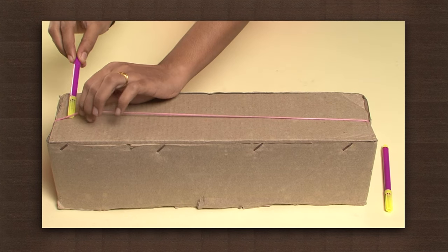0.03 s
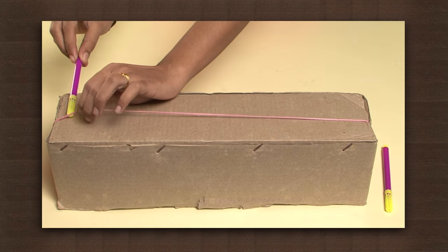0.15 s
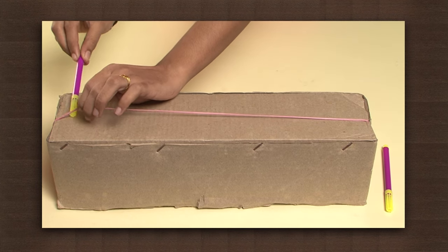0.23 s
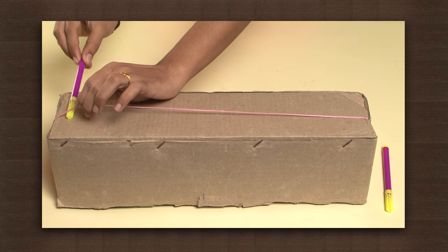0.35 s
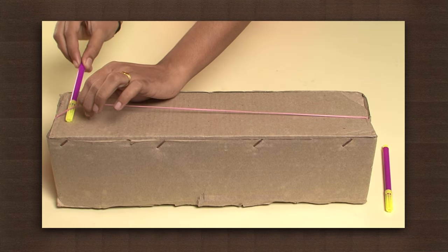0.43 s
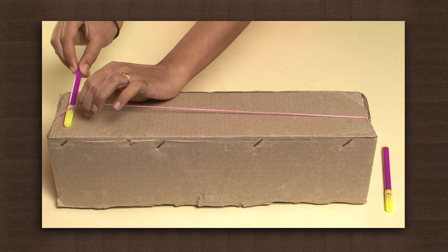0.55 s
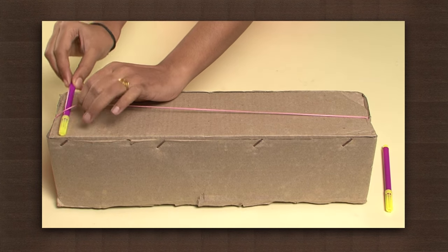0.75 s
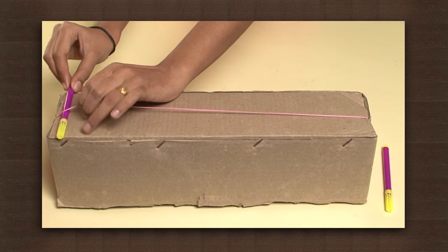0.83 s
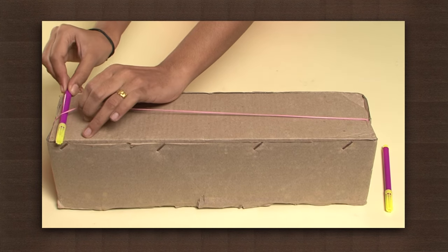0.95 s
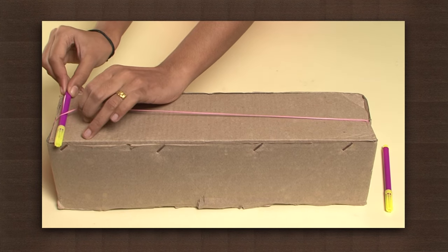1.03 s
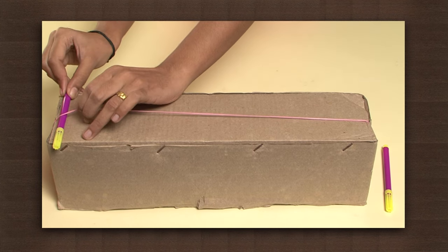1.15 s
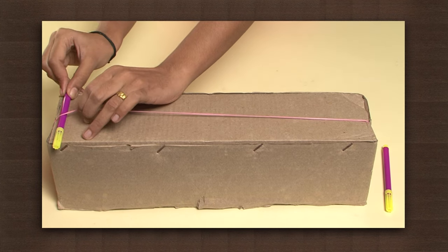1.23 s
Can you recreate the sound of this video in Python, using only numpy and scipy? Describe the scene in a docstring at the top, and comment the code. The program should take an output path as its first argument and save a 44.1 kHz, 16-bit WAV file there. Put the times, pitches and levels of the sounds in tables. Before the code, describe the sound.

One dull knock of a rubber band on cardboard, a brief twang, then soft scraping.

```python
"""A dull knock with two quick rebounds and a short low twang, amid soft rubbing in a quiet, humming room.
A rubber band stretched along a cardboard box slips off a plastic stick and slaps the lid: the stick
clicks, the box rings and the band swings, sinking in pitch. Then the stick scrapes and slides under the
band while fingers brush and tap the cardboard. Everything sits close and a little to the left."""
import sys
import numpy as np
from scipy import signal
from scipy.fft import rfft, irfft
from scipy.io import wavfile
from scipy.ndimage import uniform_filter1d

SR = 44100
rng = np.random.default_rng(int(sys.argv[2]) if len(sys.argv) > 2 else 0)


def transcribe(signal):
    """Save signal, clipped to [-1, 1], as a 16-bit WAV file at the path in sys.argv[1]."""
    frames = np.atleast_2d(signal).T
    limited = np.clip(frames, -1, 1)
    pcm = np.round(limited * 32767).astype(np.int16)
    wavfile.write(sys.argv[1], SR, pcm)


N = 57330

# Room tone. Each row: frequency in Hz, relative level in dB.
ROOM_TONE_EQ = [(20, -16), (55, 4.5), (80, 0), (140, 2.5), (220, -1), (300, -4), (400, -11.5), (530, -15),
                (950, -17), (1300, -24.5), (3500, -29.5), (7000, -32.5), (12500, -33), (14200, -39),
                (15000, -58)]
# The hum. Each entry: level of one harmonic in dB, lowest first.
HUM_HARMONICS = [-55.5, -61, -67]

# Fader moves for the four friction layers. Each row: time in seconds, level in dB.
RUB_FADER = [(0, -59.5), (.03, -52), (.11, -71.5), (.31, -58), (.4, -55.5), (.6, -59.5), (.75, -66),
             (.815, -50.5), (.9, -58.5), (1.0, -70), (1.11, -59), (1.18, -70), (1.3, -94)]  # fingers rub the lid
BRUSH_FADER = [(0, -69.5), (.16, -78), (.31, -72), (.35, -61.5), (.43, -60.5), (.62, -63), (.7, -55),
               (.75, -57.5), (.81, -51.5), (.89, -57), (.95, -62.5), (1.02, -65.5), (1.11, -57.5),
               (1.145, -62), (1.18, -75.5), (1.3, -76.5)]  # skin and plastic brush the cardboard
SCRAPE_FADER = [(.30, -74), (.325, -55.5), (.345, -46.5), (.375, -70), (.44, -70)]  # the stick catches with a dry scrape
SLIDE_FADER = [(.33, -74), (.38, -53), (.415, -51), (.53, -54.5), (.61, -58), (.67, -58.5), (.76, -68)]  # then slides along under the band
# Tone of the same four layers. Each row: frequency in Hz, relative level in dB.
RUB_EQ = [(200, -14), (330, -3), (410, -6), (520, 7.5), (640, -2), (850, -9.5), (1270, -14.5), (1520, -13),
          (1900, -22.5), (3200, -25.5), (8000, -46)]
BRUSH_EQ = [(800, -5), (2500, -2.5), (5000, -6), (7800, -6), (9500, 1), (11000, 4), (13000, 3), (14200, -7),
            (15000, -56)]
SCRAPE_EQ = [(400, -7.5), (800, -6.5), (1100, 1), (1500, -14.5), (2200, -9.5), (2700, -20), (8000, -31.5)]
SLIDE_EQ = [(380, -16), (490, 9.5), (580, -6), (720, 3), (1020, -1.5), (1270, -14), (1430, 0.5), (1600, -1),
            (1800, -14), (2300, -19.5), (3200, -30), (8000, -26)]

# Handling ticks. Each row: start in seconds, level in dB before the shared trim.
HANDLING_TICKS = [(0.0767, -50), (0.291, -46.5), (0.967, -44.5), (1.2202, -49.5)]
# Bright crackle of ticks and hits. Each row: frequency in Hz, relative level in dB.
CRACKLE_EQ = [(1500, -23), (3500, -5.5), (6500, -10), (9000, -7), (10500, -2), (12500, -4.5), (14200, -8),
              (15000, -33)]

# Hits on the box. Each row: start in seconds, thud gain in dB, click gain in dB, thud cutoff in Hz.
BAND_SLAPS = [(.2171, 1, 2, 1204), (0.2253, -9, -4, 1620), (0.2302, -18, -15, 1710)]  # the band lands and rebounds twice
LIGHT_TAPS = [(0.6475, -25, -16, 417), (0.6511, -16.5, -45, 224), (.6935, -30.5, -18, 606)]  # stick and fingers
# Resonances of box and stick. Each row: frequency in Hz, level in dB, time to fall 60 dB in seconds.
BOX_MODES = [(246, -24, 0.025), (342, -20.5, 0.038), (424, -11.5, 0.023), (489, -16, 0.043),
             (633.5, -21.5, 0.042), (747, -27.5, 0.063), (942, -18.5, 0.027), (1117, -29, 0.052),
             (1312, -22, 0.018), (1480, -27, 0.034), (1740, -31, 0.031), (1930, -34, 0.034),
             (2904, -24, 0.023)]
STICK_MODES = [(3850, -45.5, 0.013), (5030, -33.5, 0.0038), (7780, -43, 0.015), (10530, -19.5, 0.0033),
               (10760, -39, 0.0021), (13300, -40, .004), (14100, -30, 0.0053)]
# The room's short tail after a hit. Each row: frequency in Hz, relative level in dB.
ROOM_TAIL_EQ = [(100, -2), (170, 12), (300, 5.5), (500, 9.5), (680, -7), (950, -4), (1400, -15),
                (2200, -12), (4000, -30), (15000, -39)]
# The band's harmonics, lowest first. Each row: level in dB, time to fall 60 dB in seconds.
BAND_HARMONICS = [(-18.5, 0.14), (-33, 0.066), (-40, 0.063), (-34.5, 0.1)]


def undb(db):
    """Decibels to gain."""
    return 10 ** (np.asarray(db) / 20)


def since(start):
    """Seconds since a moment, zero before it."""
    return np.maximum(np.arange(N) / SR - start, 0)


def fade(age, t60):
    """Exponential decay of 60 dB in t60 seconds, silent before the start."""
    return (age > 0) * np.exp(-np.log(1000) * age / t60)


def equalise(x, eq):
    """Shape a signal with an EQ curve and bring it to rms 1."""
    hz, db = np.array(eq).T
    log_hz = np.log(np.fft.rfftfreq(N, 1 / SR) + 1)
    shaped = irfft(rfft(x) * undb(np.interp(log_hz, np.log(hz), db)), N)
    return shaped / np.std(shaped)


def noise(eq):
    """Coloured noise of rms 1."""
    return equalise(rng.standard_normal(N), eq)


def wander(rate_hz):
    """Slow random modulation with a spread of 1."""
    hold = int(SR / rate_hz)
    steps = np.repeat(rng.standard_normal(N // hold + 1), hold)
    smooth = uniform_filter1d(steps, hold)[:N]
    return smooth / np.std(smooth)


def room_bed(hum_hz=98, drift=.015, waver_db=1.6):
    """Soft room tone under a low hum that wavers in pitch and level."""
    phase = 2 * np.pi * np.cumsum(hum_hz * (1 + drift * wander(18))) / SR
    hum = sum(undb(db + waver_db * wander(12.92)) * np.sin(k * phase + rng.uniform(0, 2 * np.pi))
              for k, db in enumerate(HUM_HARMONICS, 1))
    return np.sqrt(2) * hum + undb(-55) * noise(ROOM_TONE_EQ)


def friction(fader, eq, grit=.55, catches_per_s=2200, spread_db=1.8):
    """Sliding surfaces: dense tiny catches of uneven size over a smooth hiss."""
    fires = rng.random(N) < catches_per_s / SR
    catches = fires * undb(spread_db * rng.exponential(size=N)) * rng.choice([-1, 1], N)
    texture = grit * catches / np.std(catches) + rng.standard_normal(N)
    level = undb(np.interp(since(0), *np.array(fader).T))
    return level * equalise(texture, eq)


def cardboard_rustle():
    """Scraping, sliding and rubbing sound through the box; brushing its surface hisses."""
    scrape = friction(SCRAPE_FADER, SCRAPE_EQ)
    slide = friction(SLIDE_FADER, SLIDE_EQ)
    rub = friction(RUB_FADER, RUB_EQ)
    brush = friction(BRUSH_FADER, BRUSH_EQ, grit=.45)
    return scrape + slide + rub + brush


def finger_ticks(trim_db=-8):
    """Tiny bright ticks as the fingers shift on the stick."""
    bursts = sum(undb(db + trim_db) * fade(since(start), t60=.016) for start, db in HANDLING_TICKS)
    return bursts * noise(CRACKLE_EQ)


def ring(modes, age, attack_s=.00015):
    """Damped resonances set moving by a short push."""
    push = 1 - np.exp(-age / attack_s)
    return -push * sum(undb(db) * fade(age, t60) * np.cos(2 * np.pi * hz * age) for hz, db, t60 in modes)


def box_hit(start, thud_db, click_db, cutoff_hz, room_attack_s=.0062):
    """One contact: the stick clicks, the box rings (duller for a soft touch), the room answers briefly."""
    age = since(start)
    room_tail = noise(ROOM_TAIL_EQ) * fade(age, t60=.17) * (1 - np.exp(-age / room_attack_s))
    body = ring(BOX_MODES, age) + undb(-31.5) * room_tail
    softness = signal.butter(2, cutoff_hz, fs=SR, output="sos")
    low_cut = signal.butter(1, 125, "highpass", fs=SR, output="sos")  # the box radiates little bass
    thud = signal.sosfilt(np.vstack([softness, low_cut]), body)
    crackle = noise(CRACKLE_EQ) * (fade(age, t60=.0054) + undb(-20.5) * fade(age, t60=.079))
    click = ring(STICK_MODES, age) + undb(-32) * crackle
    return undb(thud_db) * thud + undb(click_db) * click


def band_twang(rest_hz=106, sharp_share=.575, settle_s=.0195, attack_s=.038, lid_hz=24):
    """Clear of the lid, the band swings briefly, starting sharp and sinking; the lid heaves under it."""
    age = since(BAND_SLAPS[0][0])
    phase = 2 * np.pi * rest_hz * (age + sharp_share * settle_s * (1 - np.exp(-age / settle_s)))
    band = sum(undb(db) * fade(age, t60) * np.sin(k * phase)
               for k, (db, t60) in enumerate(BAND_HARMONICS, 1))
    swell = 1 - np.exp(-(age / attack_s) ** 2)
    lid_heave = undb(-28) * fade(age, t60=.055) * np.sin(2 * np.pi * lid_hz * age)
    return swell * band + lid_heave


def pan(x, left_db):
    """Mono to stereo, with the left channel left_db above the right."""
    return x * undb(np.array([[left_db], [-left_db]]) / 2)


def scene():
    """The knock up front and the quiet handling around it, all a little to the left."""
    knock = sum(box_hit(*slap) for slap in BAND_SLAPS) + band_twang()
    taps = sum(box_hit(*tap) for tap in LIGHT_TAPS)
    quiet = taps + cardboard_rustle() + room_bed() + finger_ticks()
    return pan(knock, left_db=4.2) + pan(quiet, left_db=3.45)


def record(dry):
    """A steep high cut at 14.6 kHz takes the very top off the mix."""
    return signal.sosfilt(signal.ellip(8, .2, 70, 14600, fs=SR, output="sos"), dry)


dry = scene()
out = record(dry)
transcribe(out)
```